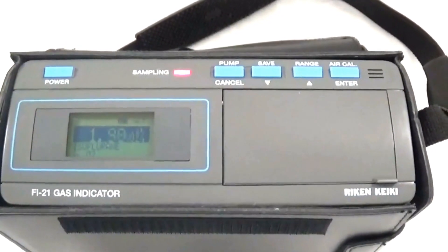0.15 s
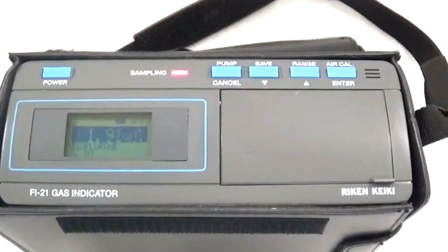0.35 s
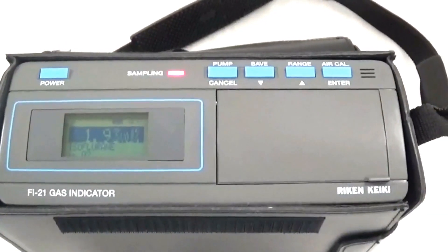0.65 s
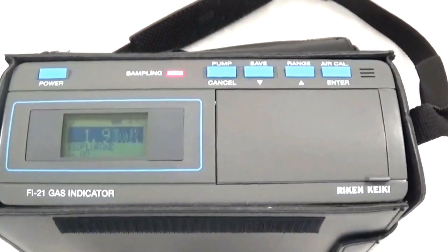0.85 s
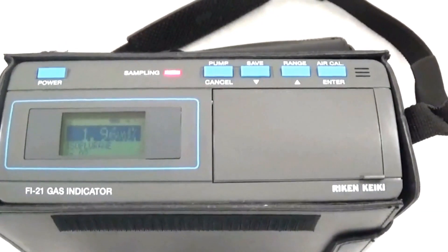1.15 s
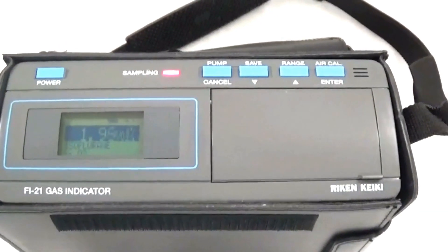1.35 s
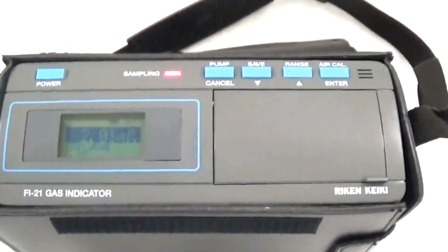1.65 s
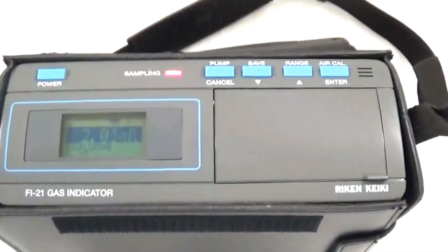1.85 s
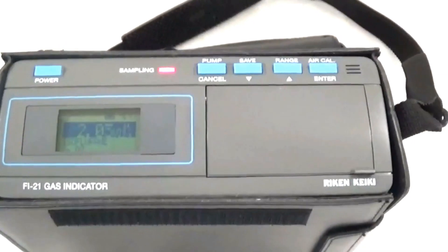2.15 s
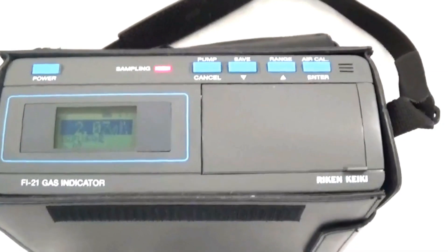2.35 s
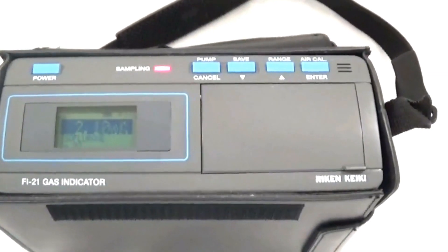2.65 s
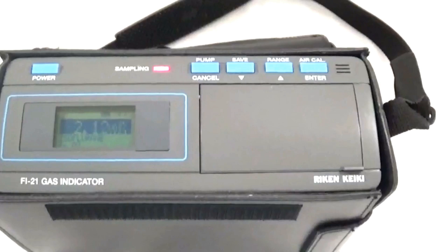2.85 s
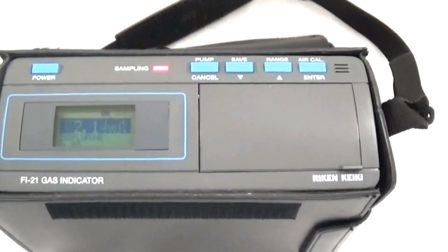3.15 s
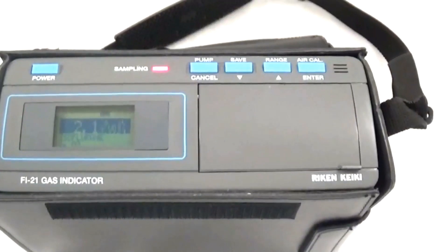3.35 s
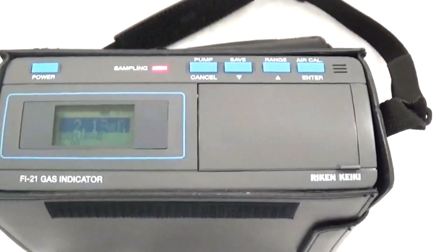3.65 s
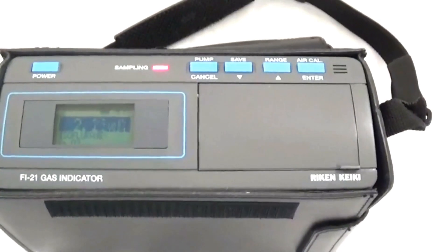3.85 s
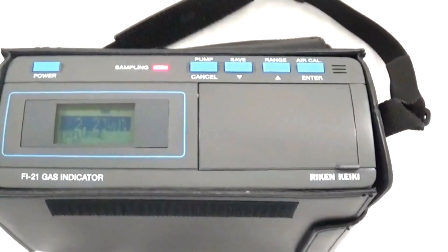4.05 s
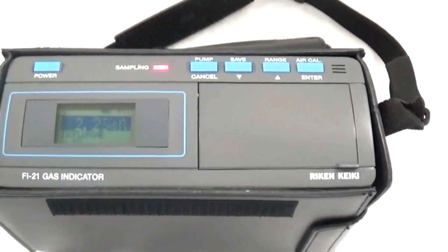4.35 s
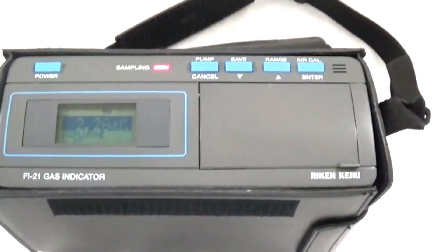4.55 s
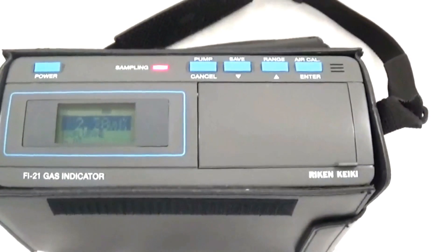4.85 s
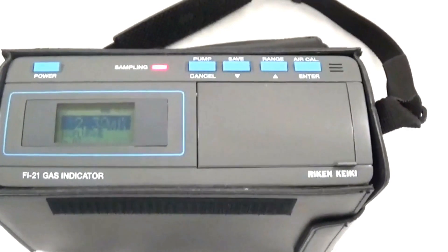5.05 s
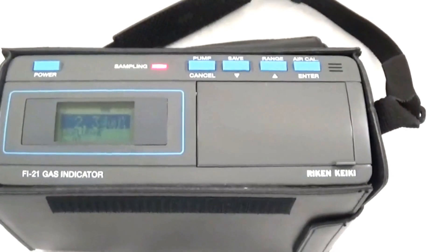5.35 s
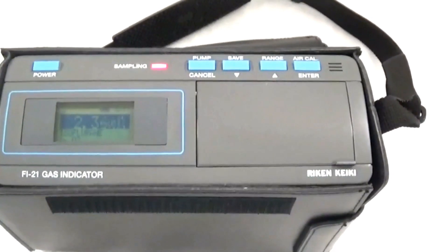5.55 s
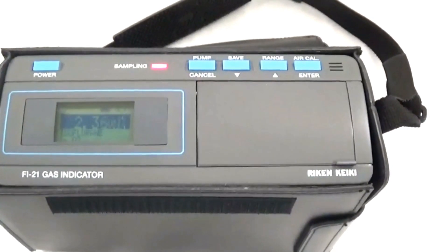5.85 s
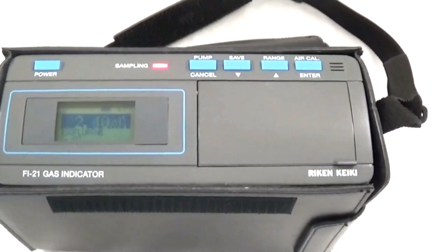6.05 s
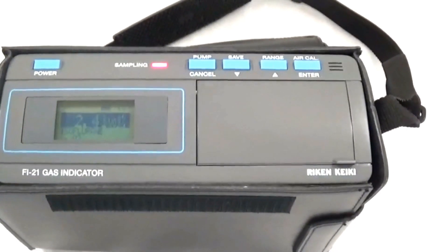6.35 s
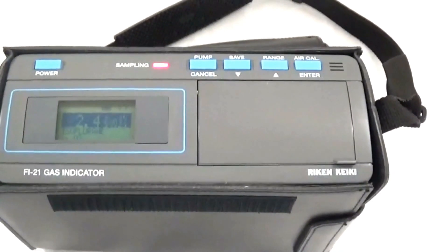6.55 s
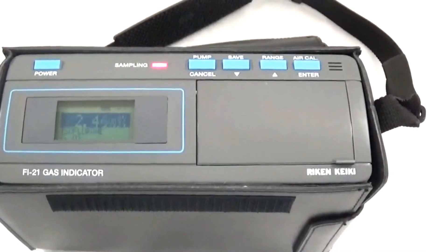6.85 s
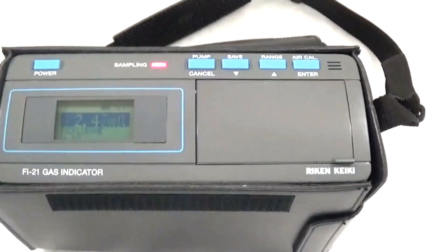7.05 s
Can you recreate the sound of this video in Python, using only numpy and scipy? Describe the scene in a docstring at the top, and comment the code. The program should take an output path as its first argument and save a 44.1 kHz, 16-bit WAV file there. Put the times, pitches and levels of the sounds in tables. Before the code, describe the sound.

For about 7.2 seconds a small air pump runs inside a portable plastic instrument, heard close in a quiet room. It is already going at 0 s: a fast, grainy buzz near 44 strokes a second, made of tiny valve slaps ringing the case around 2 to 3 kHz, a narrow lid whine near 1.7 kHz, thin hissing puffs of air and a low hum. Strokes alternate slightly unevenly until about 3.4 s, then swell gently in groups. The speed wavers and rises very slightly, while the case rattle softens from about 2.4 to 6 s, leaving the whine clearer. Soft ventilation rumble and a faint rapid high pipping stay behind throughout. A cluster of faint plastic ticks comes at 4.0 to 4.2 s, a sharper click at 4.55 s, a duller one at 5.76 s and a last small one near 7.18 s. No fade, just steady running.

```python
"""A small air pump buzzes in its plastic case at about 44 strokes a second, wavering and slowly speeding up.
Each stroke slaps a valve that rings the case, keeps the lid whining and puffs air; the turning crank hums.
Behind it, room ventilation rumbles and a faint pip repeats about 30 times a second.
A few small plastic ticks come from the hand-held camera.
The sounds are made from noise, short impulses, resonances and sine tones."""
import sys
import numpy as np
from scipy import signal
from scipy.fft import rfft, irfft, next_fast_len
from scipy.io import wavfile
from scipy.ndimage import map_coordinates

SR = 44100
rng = np.random.default_rng(int(sys.argv[2]) if len(sys.argv) > 2 else 0)


def dump(signal):
    """Clip the signal to [-1, 1] and save it as 16-bit WAV at the path in sys.argv[1]."""
    limited = np.clip(np.atleast_2d(signal).T, -1, 1)
    pcm = np.round(limited * 32767).astype(np.int16)
    wavfile.write(sys.argv[1], SR, pcm)


N = 317961  # length of the sound (samples)


def amp(db):
    """Turn decibels into a gain to multiply by."""
    return 10 ** (np.asarray(db) / 20)


def unit(x):
    """Scale a sound to an average (rms) level of 1."""
    return x / np.sqrt(np.mean(x ** 2) + 1e-20)


def along(points, hz):
    """Join (frequency, value) points with lines on a log frequency axis, as the ear hears pitch."""
    f, v = np.transpose(points)
    return np.interp(np.log(hz + 1), np.log(f + 1), v)


def curves(rows):
    """Join the rows of a table over time: one curve for each column after the time."""
    s, *columns = np.transpose(rows)
    return [np.interp(np.arange(N) / SR, s, column) for column in columns]


def wobble(rate):
    """Draw a smooth random curve through `rate` random points a second."""
    points = rng.standard_normal(int(N * rate / SR) + 4)
    return map_coordinates(points, [np.arange(N) * rate / SR])


def filtered(x, response):
    """Change the strength and phase of each frequency in x; zeros at the end leave room for echoes."""
    m = next_fast_len(N + SR // 2)
    return irfft(rfft(x, m) * response(np.fft.rfftfreq(m, 1 / SR)), m)[..., :N]


def ring(x, modes):
    """Let x excite resonances (frequency, width, level) of alternating sign, then scale to rms 1."""
    def response(f):
        total = 0
        for k, (center, width, db) in enumerate(modes):
            damping = 1j * f * width
            total = total + (-1) ** k * amp(db) * damping / (center * center - f * f + damping)
        return total

    return unit(filtered(x, response))


def gated(train, t60, leak):
    """Noise that bursts at each impulse, falls 60 dB in t60 seconds and never quite stops (leak)."""
    decay = amp(-60 * np.arange(SR // 20) / SR / t60)
    gate = signal.fftconvolve(train, decay)[:N]
    return unit((gate + leak) * rng.standard_normal(N))


def ventilation():
    """Moving air makes broad noise that swells a little, ducts drone low, and the mains hums."""
    # Tone color of the rush: (frequency [Hz], relative level per Hz [dB])
    air_color = [(12, -57), (20, -20), (119, 0), (353, -7.5), (526, -11), (669, -12), (1200, -20),
                 (1520, -20.5), (1700, -23), (1890, -15.5), (2330, -23), (3870, -28), (7320, -31.5),
                 (9550, -27), (11500, -62), (15000, -70), (22000, -120)]
    # Duct resonances: (frequency [Hz], width [Hz], relative level [dB])
    duct_modes = [(31.2, 6, -3.5), (95, 55, -11.5)]
    rush = unit(filtered(rng.standard_normal(N), lambda hz: amp(along(air_color, hz))))
    rush = amp(-51.5 + .6 * wobble(2.98)) * rush
    drone = amp(-60) * ring(rng.standard_normal(N), duct_modes)
    hum_hz = 120
    hum_phase = 2 * np.pi * hum_hz * np.arange(N) / SR + 0.25 * wobble(10.0)
    hum = amp(-52 + 0.68 * wobble(3) + 2.0 * wobble(13)) * np.sin(hum_phase)
    return rush + drone + hum


def pips():
    """Clock-steady tone bursts flip sign each time; every second one starts higher and falls in pitch."""
    pip_rate = 29.97  # pips a second
    count = (np.arange(N) / SR + .0045) * pip_rate
    index = count.astype(int)
    odd = index % 2
    t = (count % 1 - .5) / pip_rate  # seconds from the centre of the pip
    bend, strength = rng.standard_normal((index[-1] + 1, 2))[index].T  # one draw of each per pip
    center_hz = 3200 + odd * (240 + 40 * bend) + 25 * bend
    fall = odd * 38000 * amp(5.1 * bend)  # half the pitch fall (Hz a second)
    cycles = center_hz * t - fall * t ** 2
    shape = np.exp(-(t / .0032) ** 2) * (1 + .45 * wobble(500))  # short and rough
    sign = 1 - 2 * odd
    return amp(-58.0 + 0.64 * strength) * sign * shape * np.cos(2 * np.pi * cycles)


def ticks():
    """Small contacts crack noisily and ring the plastic camera shell, most in modes near their own pitch."""
    # Contacts: (time [s], level [dB], pitch [Hz], crack level relative to the tick level [dB])
    tick_list = [(4.045, -57, 3500, 2), (4.068, -52, 3500, 1), (4.08, -54, 4400, -4), (4.09, -59, 4000, -1),
                 (4.141, -53, 4000, 2), (4.149, -54, 4200, -4), (4.159, -47.5, 2800, 4.5),
                 (4.532, -42, 1500, -2), (4.5598, -31.5, 2600, -9), (4.567, -36.5, 1500, -9),
                 (5.757, -36.5, 270, -8), (5.7595, -44, 940, 1.5), (5.762, -39.5, 3680, -17),
                 (7.1772, -38.5, 490, -10)]
    # Ways the shell rings: (frequency [Hz], relative level [dB], time to fall 60 dB [s])
    shell_modes = [(244, -1, 0.018), (500, 5, 0.021), (915, -1.5, 0.053), (1310, -5, .035),
                   (2570, 2.5, 0.0061), (3684, -1.5, 0.025), (4500, -8, 0.012)]
    reach_db = 36  # a mode one octave off the contact's pitch rings this much weaker
    crack_t60 = 0.026  # time for the crack to fall 60 dB (s)
    out = np.zeros(N + SR)
    t = np.arange(SR // 10) / SR
    for s, db, hz, crack_db in tick_list:
        b, a = signal.butter(N=2, Wn=[.42 * hz, 1.9 * hz], btype="band", fs=SR)
        noise = unit(signal.lfilter(b, a, rng.standard_normal(len(t))))
        crack = amp(crack_db - 60 * t / crack_t60) * noise
        shell = np.zeros(len(t))
        for mode_hz, level, t60 in shell_modes:
            octaves_off = np.log2(mode_hz / hz)
            fading = amp(level - reach_db * octaves_off ** 2 - 60 * t / t60)
            shell += fading * np.sin(2 * np.pi * mode_hz * t)
        out[round(s * SR):][:len(t)] += amp(db) * (crack + shell)
    return out[:N]


def crank():
    """Add up the crank speed to get its position; also give the speed above the usual 44 turns a second."""
    # Crank speed: (time [s], speed [turns a second])
    speed_points = [(0.0, 43.695), (0.5, 43.688), (0.95, 43.792), (1.45, 43.8), (1.95, 43.921),
                    (2.2, 43.84), (2.55, 43.989), (3.0, 43.885), (3.35, 43.956), (3.6, 44.171),
                    (3.9, 44.01), (4.2, 44.093), (4.5, 43.99), (4.65, 44.337), (5.2, 44.48), (5.9, 44.612),
                    (6.1, 44.566), (6.9, 44.609), (7.21, 44.527)]
    usual_speed, start_turns = 44, -.374  # turns a second; position at the start (turns)
    (speed,) = curves(speed_points)
    return speed - usual_speed, start_turns + np.cumsum(speed) / SR


def contacts(turns, scatter_db):
    """Place impulses for case, lid and puff at each contact of each stroke, uneven in time and strength."""
    # Contacts in a stroke: (position [turns], then relative levels: case [dB], lid [dB], puff [dB])
    stroke_contacts = [(-.166, -1.5, -3.5, -7.5), (-.085, -4, -6.5, -6.5), (0, 2, 2, -3),
                       (0.269, -14, -6.5, -25), (0.549, -8.5, -16.5, -9.5), (0.699, -11, -11.5, -24)]
    # Random timing spread, one number for each of those contacts: (spread [turns])
    timing_scatter = [.0012, .01, .001, .004, .03, .03]
    # Change on even strokes while limping, opposite on odd ones: (case [dB], lid [dB], puff [dB])
    limp_db = [1.5, -1.5, 1.7]
    # Depth of the later slow swell: (case [dB], lid [dB], puff [dB])
    nod_db = [2, 0.5, 0.7]
    limp_turns, limp_ends_s = .0043, 3.4  # even strokes late and odd early by this (turns), until then (s)
    stroke = np.arange(np.ceil(turns[0]), turns[-1])
    limping = stroke < turns[int(limp_ends_s * SR)]
    limp = (-1) ** stroke * limping
    # After the limp, strokes swell about once in four turns
    nod = np.cos(2 * np.pi * (.26 * stroke + .45)) * ~limping
    uneven_db = np.outer(limp_db, limp) + np.outer(nod_db, nod)
    trains = np.zeros((3, N))
    for (at, *levels_db), scatter in zip(stroke_contacts, timing_scatter):
        chance = rng.standard_normal((len(stroke), 2))
        position = stroke + at + limp_turns * limp + scatter * chance[:, 0]
        when = np.interp(position, turns, np.arange(N)).astype(int)
        for train, db, uneven in zip(trains, levels_db, uneven_db):
            strength = amp(db + uneven + scatter_db * chance[:, 1])
            train += np.bincount(when, strength, N)
    return trains


def flap(train, lag_s, rattle):
    """A rubber flap gives a clean knock plus a noisy rattle; its soft landing dulls the treble."""
    blow = unit(train) + rattle * gated(train, t60=0.02, leak=0.024)

    def soft_and_late(hz):
        return np.exp(-2j * np.pi * hz * lag_s) / (1 + 1j * hz / 2600) ** 2

    return filtered(blow, soft_and_late)


def crank_tone(order, level_db, sway_db, turns):
    """A sine that makes `order` cycles in each crank turn, swaying in level."""
    return np.sqrt(2) * amp(level_db + sway_db * wobble(6)) * np.cos(2 * np.pi * order * (turns + 0.1208))


def crank_hum(faster, turns):
    """The crank hums at whole multiples of its speed; order 15 gets louder as it turns faster."""
    # Hum tones: (order [cycles a turn], level [dB rms before the sway])
    hum_orders = [(1, -97), (2, -66), (3, -66), (4, -62.5), (5, -61.5), (6, -66.5), (8, -61), (9, -74),
                  (10, -80), (11, -84), (14, -76.5), (16, -75.5), (17, -76)]
    hum = sum(crank_tone(order, db, 1.8, turns) for order, db in hum_orders)
    return hum + crank_tone(15, -68 + 8.8 * faster, 0.49, turns)


def air_puffs(train, faster):
    """Puffs of noise excite the air port; they get weaker as the pump turns faster."""
    # Air port resonances: (frequency [Hz], width [Hz], relative level [dB])
    port_modes = [(4700, 2700, -10), (6930, 430, -6), (7670, 100, -4), (8370, 113, 2.5), (9420, 317, 1.5),
                  (10810, 490, -2.5), (13180, 300, -12), (14900, 780, -24.5)]
    puffs = gated(train * amp(1.17 * wobble(25)), t60=.008, leak=0.11)
    return amp(-60.5 - 1.8 * faster + 0.57 * wobble(14)) * ring(puffs, port_modes)


def lid_whine(train, faster):
    """Valve slaps keep the lid ringing at its narrow resonances, a touch louder at higher speed."""
    # Lid resonances: (frequency [Hz], width [Hz], relative level [dB])
    lid_modes = [(1337, 93, -12), (1686, 21, 6), (1769, 47, -1.5)]
    blows = flap(train, lag_s=0.00034, rattle=0.096)  # the lid answers sooner than the case walls
    return amp(-58.5 + 0.15 * faster) * ring(blows, lid_modes)


def case_ring(train):
    """Valve slaps ring the case walls, which answer after the puff."""
    # Case wall resonances: (frequency [Hz], width [Hz], relative level [dB])
    case_modes = [(2067, 126, 3.5), (2350, 85, 6.5), (2748, 99, -0.5), (3125, 71, -4)]
    # Course of the case level before its small wobble: (time [s], level [dB])
    slap_levels = [(0, -52.5), (2.4, -53), (5, -56), (5.8, -58), (7.21, -58.5)]
    (slap_db,) = curves(slap_levels)
    blows = flap(train, lag_s=0.001245, rattle=.36)
    return amp(slap_db + 0.5 * wobble(17)) * ring(blows, case_modes)


def pump():
    """One crank drives everything: valve slaps in case and lid, air puffs and hum."""
    faster, turns = crank()
    on_case, on_lid, on_air = contacts(turns, scatter_db=.9)
    return case_ring(on_case) + lid_whine(on_lid, faster) + air_puffs(on_air, faster) + crank_hum(faster, turns)


def scene():
    """Mix all sources; room reflections that shift as the hand-held camera sways make left and right differ."""
    # Stereo width: (frequency [Hz], gain of the left-right difference [dB])
    width_curve = [(60, -30), (120, -38), (240, -18), (480, -12), (950, -3.5), (1890, -16), (3770, -4.5),
                   (7520, -7), (15000, -17.5)]
    # Stereo balance: (frequency [Hz], left minus right [dB])
    balance_curve = [(60, 0.5), (380, 0.0), (2380, -0.5), (15000, -0.5)]
    mid = ventilation() + pips() + ticks() + pump()
    # Six short noisy echo tails, falling 60 dB in 0.027 s
    tails = rng.standard_normal((6, SR // 10)) * amp(-60 * np.arange(SR // 10) / SR / 0.027)
    echoes = signal.fftconvolve(mid[None], tails / np.linalg.norm(tails[0]), axes=1)[:, :N]
    side = unit(sum(wobble(20) * echo for echo in echoes)) * np.std(mid)
    side = filtered(side, lambda hz: amp(along(width_curve, hz)))
    left_right = np.array([mid + side, mid - side])
    return filtered(left_right, lambda hz: amp(np.outer([.5, -.5], along(balance_curve, hz))))


def record(dry):
    """The treble dips deeply near 12 kHz, and nothing is kept above the band limit."""
    # Treble response: (frequency [Hz], gain [dB])
    treble_curve = [(10900, 0), (11500, -13), (12000, -36), (12800, -29), (13200, -3.5), (14800, 1),
                    (15600, -32)]
    top_hz = 15680
    return filtered(dry, lambda hz: amp(along(treble_curve, hz)) * (hz < top_hz))


dry = scene()
out = record(dry)
dump(out)
```